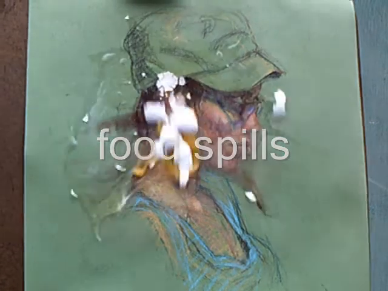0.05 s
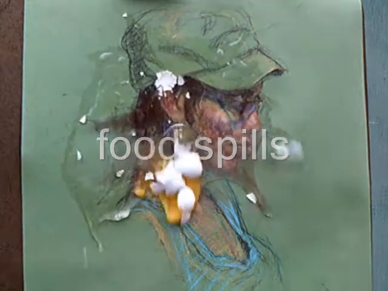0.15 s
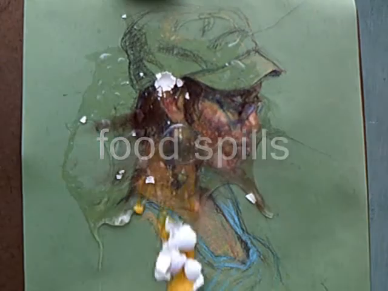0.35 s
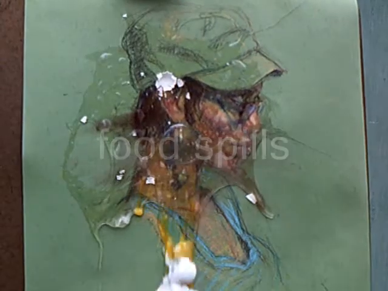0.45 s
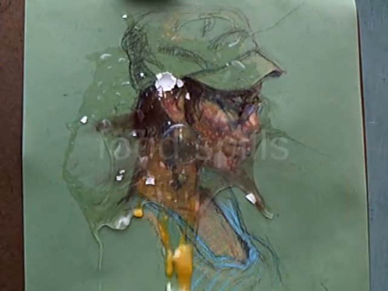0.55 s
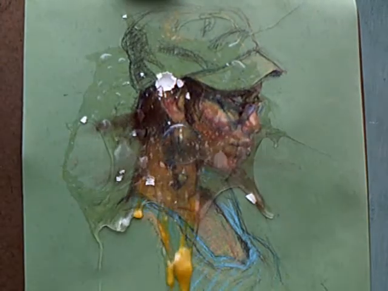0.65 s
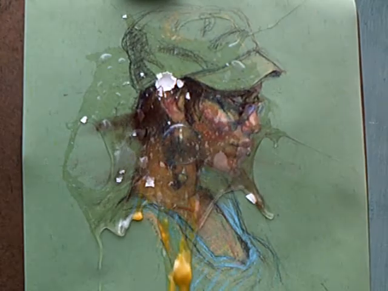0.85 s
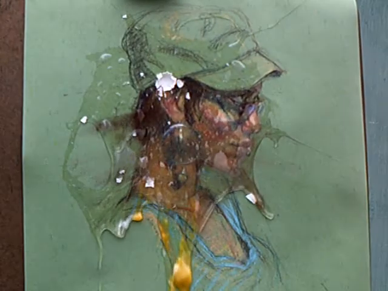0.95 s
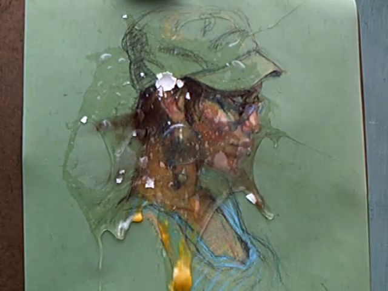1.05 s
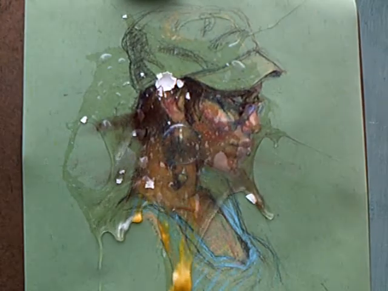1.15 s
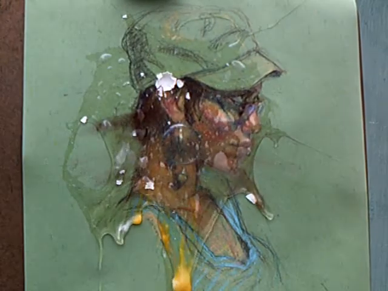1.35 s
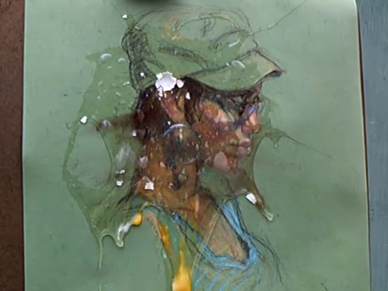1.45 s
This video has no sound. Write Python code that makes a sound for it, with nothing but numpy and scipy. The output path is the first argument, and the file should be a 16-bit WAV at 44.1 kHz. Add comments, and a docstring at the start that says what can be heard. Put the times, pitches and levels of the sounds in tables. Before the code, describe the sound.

One loud, slightly distorted splat sounds near the microphone as an egg bursts on paper. Light papery taps and wet crackles follow, and the mess slides down with a soft sizzle over a small room's low rumble.

```python
"""In a small room, a soft, wet lump of food slaps a paper portrait on a board.
Bits and drops patter down after it, each a papery knock with a wet crackle; a fine fizz runs while
the mess slides down, then stops. The room rings briefly over a low rumble. The slap overloads a cheap
recorder nearby, which holds each of its slow samples as a step and so adds a gritty treble."""
import sys
import numpy as np
from scipy import signal
from scipy.fft import rfft, irfft
from scipy.io import wavfile

SR = 44100
rng = np.random.default_rng(int(sys.argv[2]) if len(sys.argv) > 2 else 0)


def log_audio(samples):
    """Write samples as a 16-bit WAV file to the path given in sys.argv[1]."""
    # one column per channel
    frames = np.atleast_2d(samples).T
    # limit to full scale, then quantise
    limited = np.clip(frames, -1, 1)
    pcm = np.round(limited * 32767).astype(np.int16)
    wavfile.write(sys.argv[1], SR, pcm)


N = 66150
HIT_S = 0.2009  # when the lump lands

# The lump's pieces. Each row: start in seconds, knock in dB, wet crackle in dB, fade time in seconds.
PIECES = [(0.2013, -3.5, -8.5, 0.0024), (0.2028, 3.5, 10, 0.0011), (0.206, 4.5, -33, 0.0023),
          (0.208, -19, -3, 0.0061), (0.2132, -5.5, -13.5, 0.013), (0.2265, -21, -8, .002),
          (0.2309, 0.5, -34, 0.0019), (0.2362, -36, -9.5, 0.004), (.2435, -16.5, -27, 0.0065),
          (0.253, -11, -21.5, 0.013), (.2638, -10, -14.5, 0.004), (0.269, -19, -40, 0.0013)]
# Later drops. Each row: start in seconds, knock in dB, wet crackle in dB, fade time in seconds.
LATE_DROPS = [(0.29, -28.5, -28.5, 0.0063), (0.304, -18, -33, 0.0039), (0.325, -45, -27, 0.0017),
              (0.3566, -17, -31.5, 0.0056), (.365, -20, -48, 0.0082), (0.393, -24, -32, 0.0059),
              (0.4232, -21, -47, 0.0019), (.451, -30, -34.5, 0.0026), (0.4795, -23, -29.5, 0.012),
              (0.482, -11.5, -30, 0.00096), (0.503, -26, -24.5, 0.0021), (0.5274, -24, -37, 0.0039),
              (0.535, -42, -37, 0.0065), (0.589, -31.5, -49, 0.011), (.767, -33, -50, 0.0061),
              (.776, -31, -54, 0.0047), (.799, -49, -35.5, 0.0059), (1.085, -38, -37.5, 0.0071)]
# The tone of a piece's knock. Each row: frequency in Hz, relative level in dB.
PIECE_TONE = [(30, -19), (70, -17.5), (130, -10), (260, -7), (450, -2), (600, -6), (740, -11), (1000, -2.5),
              (1180, 1.5), (1400, -7.5), (2200, -21), (5500, -24.5)]
# The tone of a drop's knock. Each row: frequency in Hz, relative level in dB.
DROP_TONE = [(30, -4), (130, -5.5), (330, -5), (600, -0.5), (780, -15.5), (1000, 1), (1130, 4.5),
             (1400, -12), (2200, -23), (5500, -28.5)]


def splatter():
    """The pieces squash one after another inside a thinning spray; lighter drops follow, each a sharper knock
    with its own wet crackle."""
    taps = grains(per_second=12000, spread_db=2.5)
    crackle = grains(per_second=12000, spread_db=2.5)
    spray = undb(-21) * fade(HIT_S, decay_s=0.039)
    heavy = sum(undb(db) * landing(taps, start, decay, click_share=0.32)
                for start, db, _, decay in PIECES)
    light = sum(undb(db) * landing(taps, start, decay, click_share=0.52)
                for start, db, _, decay in LATE_DROPS)
    squelch = sum(undb(db) * landing(crackle, start, decay, click_share=0.2)
                  for start, _, db, decay in PIECES + LATE_DROPS)
    knocks = paper_knock(heavy + spray * taps, PIECE_TONE) + paper_knock(light, DROP_TONE)
    return knocks + wet_crackle(squelch + spray * crackle)


def landing(cloud, start, decay, click_share):
    """A piece puts a share of its energy into one click, the rest into tiny ones as it squashes flat."""
    force = np.sqrt(1 - click_share) * unit_energy(cloud * fade(start, decay))
    force[int(start * SR)] -= np.sqrt(click_share)
    return force * np.sqrt(decay * SR / 2)  # a longer squash carries more energy


# The paper's notes on its board. Each row: pitch in Hz, seconds to fade by 60 dB, relative level in dB.
PAPER_NOTES = [(142, .1, -6), (202, .15, -4), (326, .2, -4), (410, .14, -4), (455, .14, -5), (555, .1, -11),
               (852, .14, -5), (952, .14, -4), (1080, .12, 0), (1125, .1, 0), (1166, .13, 0),
               (1207, .12, 2), (1254, .14, -1), (1444, .12, -11)]


def paper_knock(force, tone):
    """The paper answers with a hollow knock and rings on."""
    ring = undb(-9.5) * unit_energy(modes(PAPER_NOTES))
    return through(force, unit_energy(colour(tone)) + ring)


# The tone of the wet crackle. Each row: frequency in Hz, relative level in dB.
CRACKLE_TONE = [(60, -19), (700, -24.5), (2000, -16), (2700, -6.5), (3100, -9), (3500, -1.5), (4600, -6.5),
                (5500, -4.5)]
# Its bright ring. Each row: pitch in Hz, width in Hz, relative level in dB.
CRACKLE_RING = [(3994, 480, 8)]


def wet_crackle(force):
    """Wet films and droplets burst with a bright crackle."""
    tone = in_band(colour(CRACKLE_TONE) + resonances(CRACKLE_RING))
    return through(force, unit_energy(tone))


# The whole board's low notes. Each row: pitch in Hz, seconds to fade by 60 dB, relative level in dB.
BOARD_NOTES = [(53, 0.16, -22.5), (148, 0.13, -0.5), (207, .14, -2.5), (362, 0.037, -4.5)]


def board_thud(push_s=0.0014):
    """The lump's soft push sets the whole board swinging."""
    progress = (np.arange(N) / SR - HIT_S) / push_s
    push = np.sin(np.pi * np.clip(progress, 0, 1))
    return -undb(-2) * through(push / push.sum(), modes(BOARD_NOTES))


# How loud the slide is. Each row: time in seconds, fizz in dB, sizzle in dB, rustle in dB.
SLIDE_LEVELS = [(.3, -37.5, -55, -45), (.46, -55.5, -51, -40), (0.529, -42.5, -66, -34.5),
                (0.581, -51, -45, -57), (.68, -50, -46.5, -58), (.79, -43, -43.5, -41),
                (.9, -48, -44, -43.5), (.94, -44.5, -42, -40.5), (1.03, -49.5, -43, -41),
                (1.124, -48.5, -49.5, -47.5), (1.135, -87, -91, -79)]
# The ring of the fizz. Each row: pitch in Hz, width in Hz, relative level in dB.
FIZZ_RING = [(4095, 220, 0)]
# The tone of the broad sizzle. Each row: frequency in Hz, relative level in dB.
SIZZLE_TONE = [(200, -35), (1500, -1), (1850, -13.5), (2200, -5), (3200, -9), (4200, -2), (5500, -10)]
# The tone of the paper's rustle. Each row: frequency in Hz, relative level in dB.
RUSTLE_TONE = [(40, -20), (300, -26.5), (460, -1.5), (750, -25), (930, 0), (1100, 4), (1350, -9.5),
               (1800, -10), (2400, -40), (5500, -25)]


def slide(spurts_per_s=150, spurt_db=3):
    """While the mess runs down, a ringing fizz gives way to a spurting sizzle over a faint rustle."""
    t = np.arange(N) / SR
    times, *levels = np.array(SLIDE_LEVELS).T
    gains = [undb(np.interp(t, times, db)) * (t > times[0]) for db in levels]
    fizz, sizzle, rustle = (gain * grains(per_second=7000, spread_db=3) for gain in gains)
    flicker = np.interp(t * spurts_per_s, np.arange(N), rng.standard_normal(N))
    sizzle *= undb(spurt_db * flicker)
    return (through(fizz, unit_energy(resonances(FIZZ_RING)))
            + through(sizzle, unit_energy(in_band(colour(SIZZLE_TONE))))
            + through(rustle, unit_energy(colour(RUSTLE_TONE))))


# Faint dry ticks before the hit. Each row: start in seconds, level in dB.
EARLY_TICKS = [(.027, -40.5), (0.0356, -31.5), (0.0406, -31), (.0492, -29)]
# Their tone. Each row: frequency in Hz, relative level in dB.
EARLY_TICK_TONE = [(200, -45), (2500, -21), (3400, -15.5), (4130, 2.5), (4800, -11.5), (5500, -23.5)]


def ticks():
    """A few tiny bright ticks sound close to the microphone."""
    bursts = sum(undb(db) * fade(start, decay_s=0.0012) for start, db in EARLY_TICKS)
    tone = unit_energy(in_band(colour(EARLY_TICK_TONE)))
    return through(rng.standard_normal(N) * bursts, tone)


def room_echo(x, delay_s=0.0044, split_hz=1500):
    """A small room rings briefly; the treble dies sooner."""
    def tail(band, ring_s):
        noise = unit_energy(rng.standard_normal(N) * fade(delay_s, ring_s / np.log(1000)))
        return signal.sosfilt(signal.butter(2, split_hz, band, fs=SR, output="sos"), noise)
    return through(x, undb(-10.5) * tail("low", ring_s=0.4) + undb(-18) * tail("high", ring_s=0.33))


# The tone of the room's background. Each row: frequency in Hz, relative level in dB.
RUMBLE_TONE = [(25, -4.5), (48, -11), (70, -6), (84, 5.5), (100, -4.5), (125, -6), (200, -16.5), (330, -27),
               (600, -23.5), (1000, -24), (1500, -32), (2400, -48), (4200, -39), (5500, -47.5)]


def rumble():
    """A steady low rumble with a trace of hiss fills the room."""
    spectrum = rfft(rng.standard_normal(N)) * rfft(colour(RUMBLE_TONE))
    return undb(-34.5) * unit(irfft(spectrum, N))


def undb(db):
    """Turn decibels into a number to multiply by."""
    return 10 ** (np.asarray(db) / 20)


def unit(x):
    """Scale a sound to an average power of 1."""
    return x / np.sqrt(np.mean(x ** 2))


def unit_energy(x):
    """Scale to a total energy of 1; such a filter keeps the level of white noise."""
    return x / np.sqrt(np.sum(x ** 2))


def through(x, response):
    """Pass a sound through a filter, given as its response to one click."""
    return signal.fftconvolve(x, response)[:N]


def colour(points, size=8192):
    """Build the click response of a filter from a tone table."""
    hz, db = np.array(points).T
    freqs = np.maximum(np.arange(size // 2 + 1) * SR / size, 1)
    gains = undb(np.interp(np.log(freqs), np.log(hz), db))
    cepstrum = irfft(np.log(gains))
    # fold it in half so that nothing sounds before the click
    cepstrum[1:size // 2] *= 2
    cepstrum[size // 2 + 1:] = 0
    return np.pad(irfft(np.exp(rfft(cepstrum))), (0, N - size))


def resonances(peaks):
    """Build the click response of ringing peaks; wider ones die sooner."""
    t = np.arange(N) / SR
    return sum(undb(db) * 2 * np.pi * width / SR * np.exp(-np.pi * width * t) * np.cos(2 * np.pi * hz * t)
               for hz, width, db in peaks)


def modes(notes):
    """A struck object rings with several fading notes."""
    t = np.arange(N) / SR
    return sum(undb(db) * np.exp(-np.log(1000) * t / ring_s) * np.sin(2 * np.pi * hz * t)
               for hz, ring_s, db in notes)


def fade(start, decay_s):
    """Jump to full level at the start, then die away."""
    age = np.arange(N) / SR - start
    return (age >= 0) * np.exp(-np.maximum(age, 0) / decay_s)


def grains(per_second, spread_db):
    """Make a dense cloud of tiny clicks of uneven size."""
    sizes = undb(spread_db * np.minimum(rng.exponential(size=N), 5))
    hits = rng.random(N) < per_second / SR
    return unit(hits * rng.choice([-1, 1], N) * sizes)


def in_band(x, top_hz=5400):
    """Keep only the frequencies that the recorder takes in."""
    return signal.sosfiltfilt(signal.ellip(6, 0.15, 40, top_hz, fs=SR, output="sos"), x)


def scene():
    """Add up everything at the microphone, in mono."""
    direct = splatter() + board_thud() + slide() + ticks()
    return (direct + room_echo(direct) + rumble())[None]


def record(dry):
    """The recorder clips the splat flat, samples slowly, holds each sample as a step and cuts the top."""
    hold_samples, top_hz = 4, 15650
    clipped = np.clip(in_band(dry), -1, 1)
    # the steps mirror the sound into a gritty treble
    steps = np.repeat(clipped[:, ::hold_samples], hold_samples, axis=1)[:, :N]
    return signal.sosfiltfilt(signal.ellip(8, 0.1, 50, top_hz, fs=SR, output="sos"), steps)


dry = scene()
out = record(dry)
log_audio(out)
```